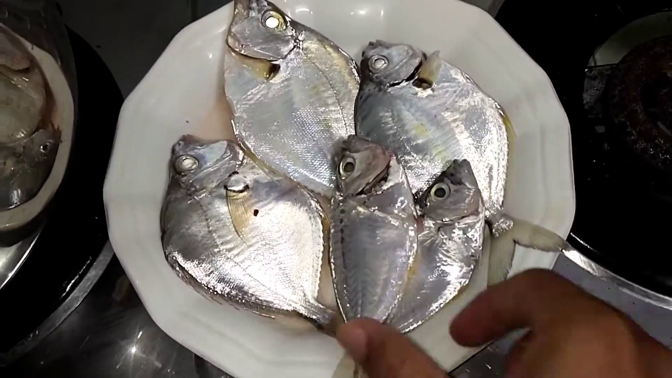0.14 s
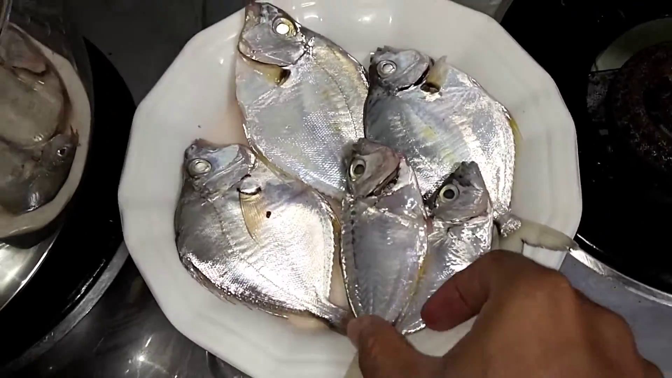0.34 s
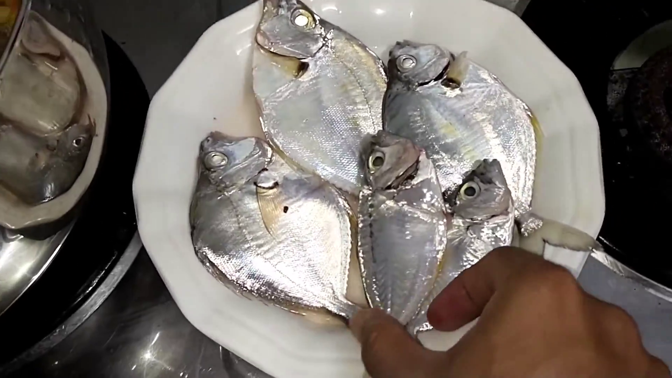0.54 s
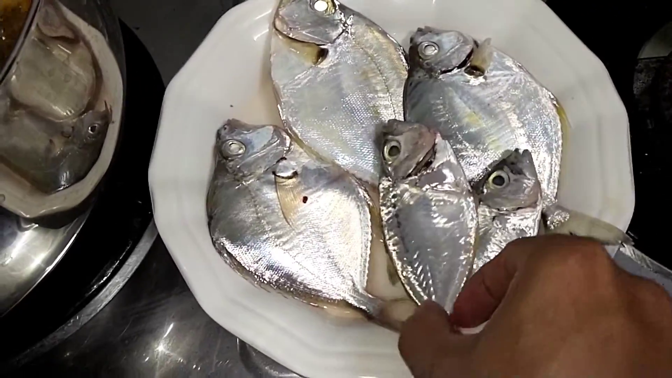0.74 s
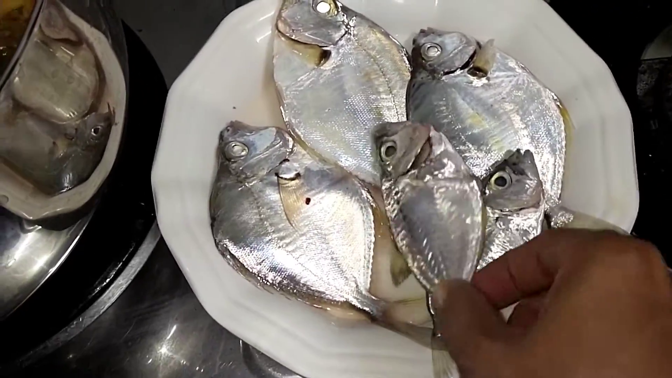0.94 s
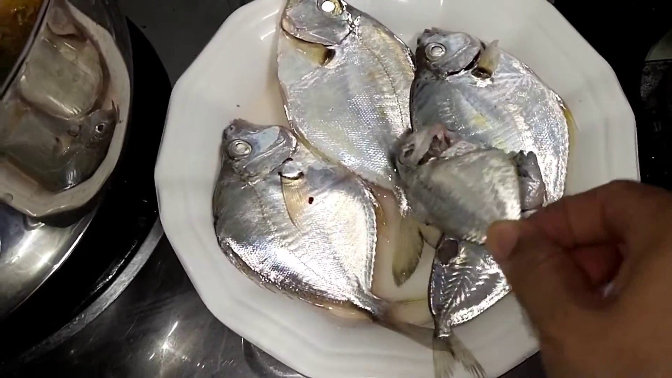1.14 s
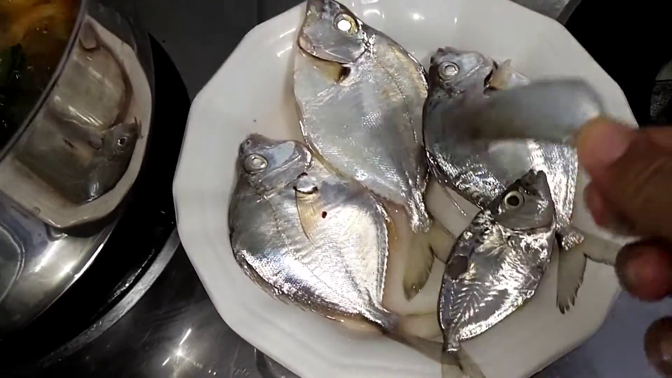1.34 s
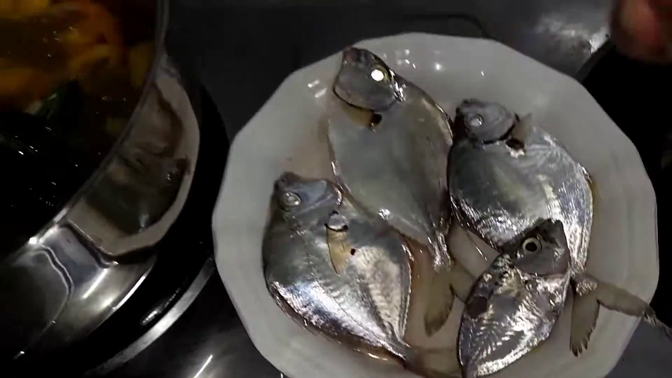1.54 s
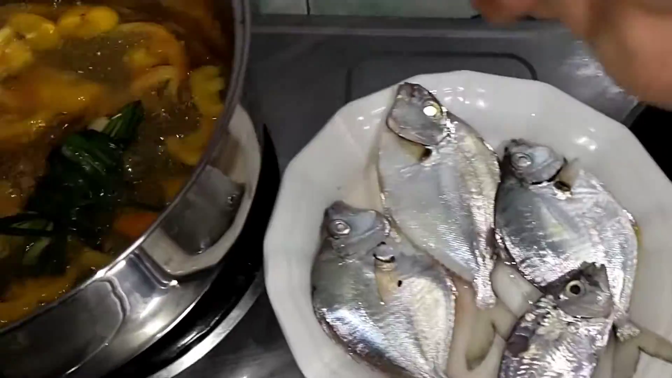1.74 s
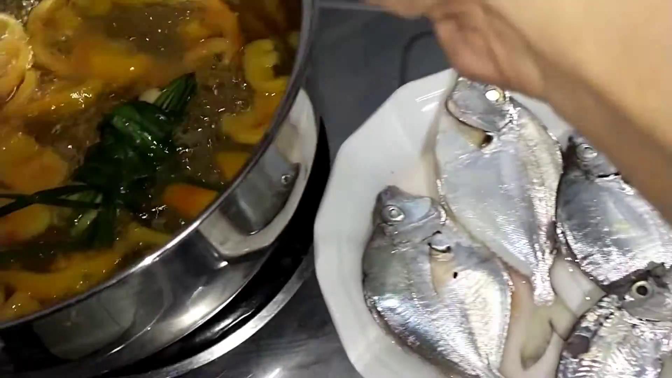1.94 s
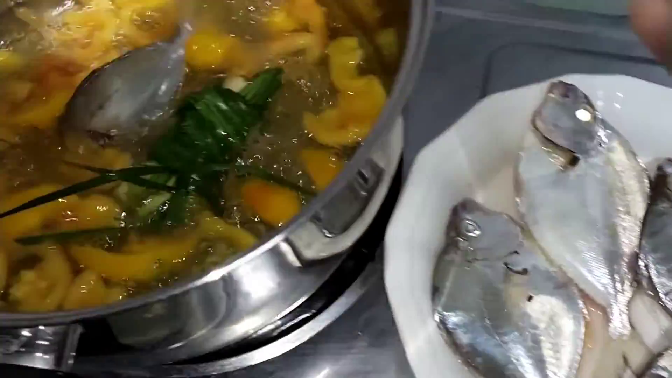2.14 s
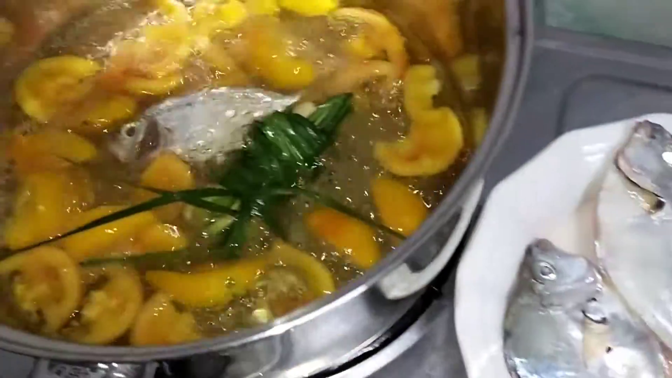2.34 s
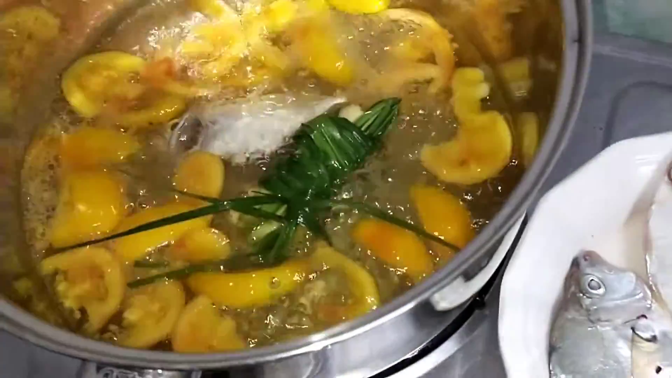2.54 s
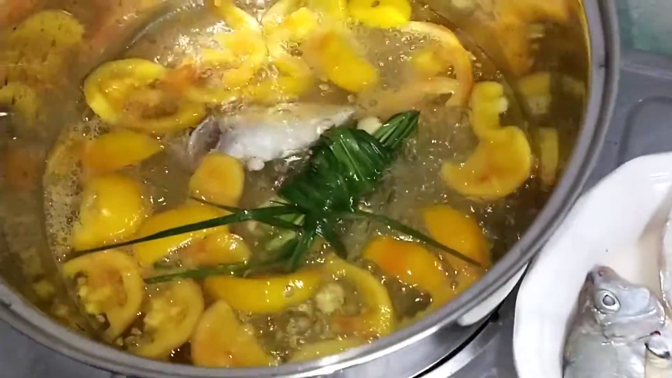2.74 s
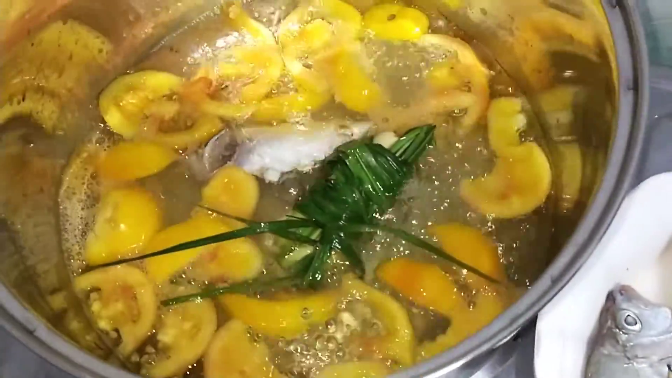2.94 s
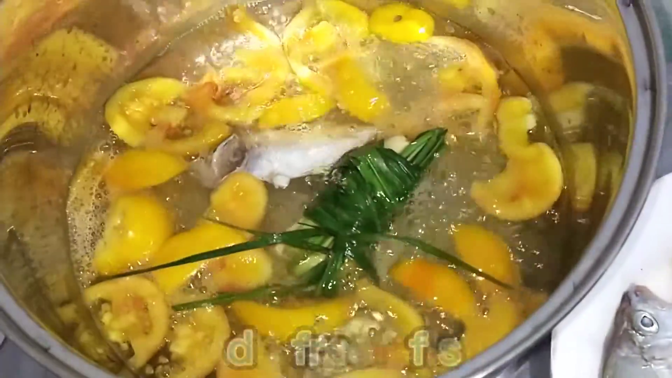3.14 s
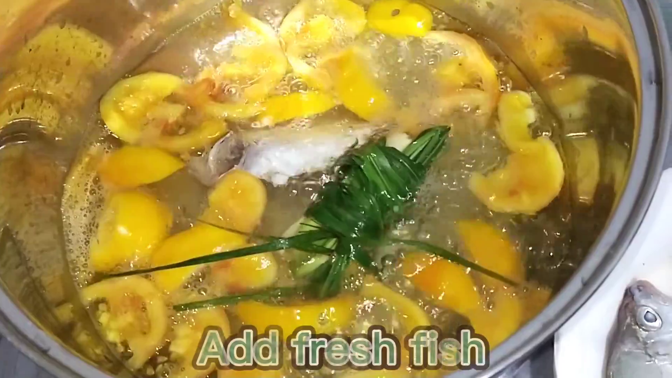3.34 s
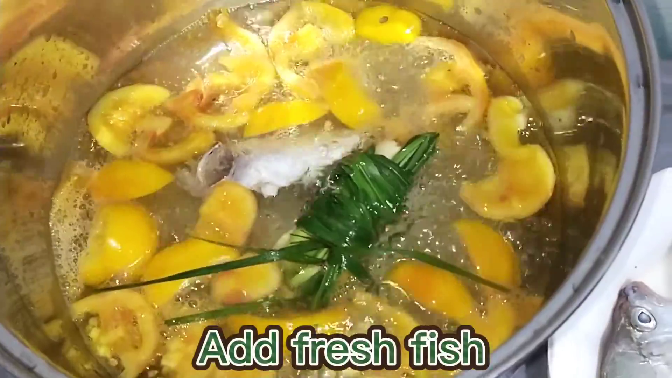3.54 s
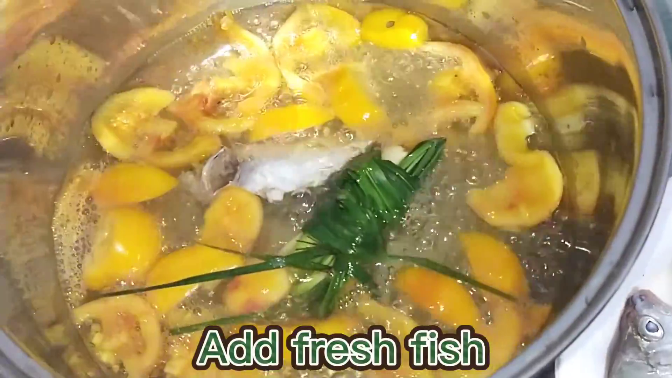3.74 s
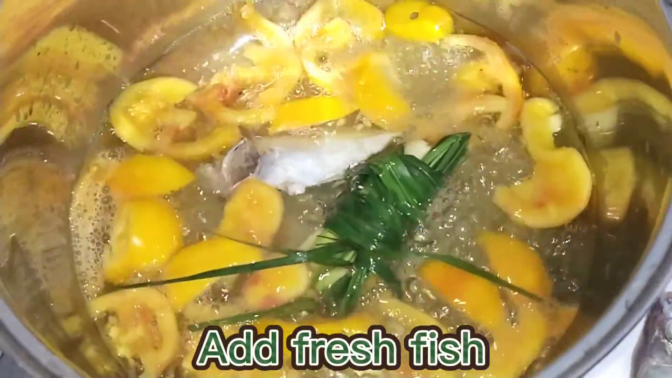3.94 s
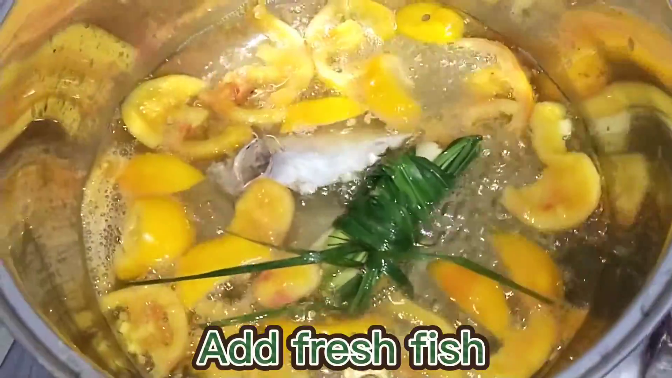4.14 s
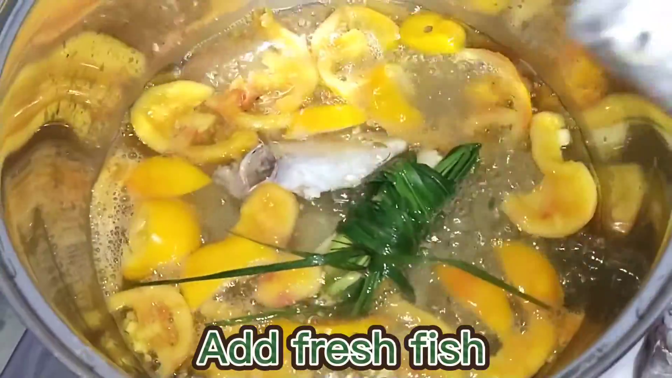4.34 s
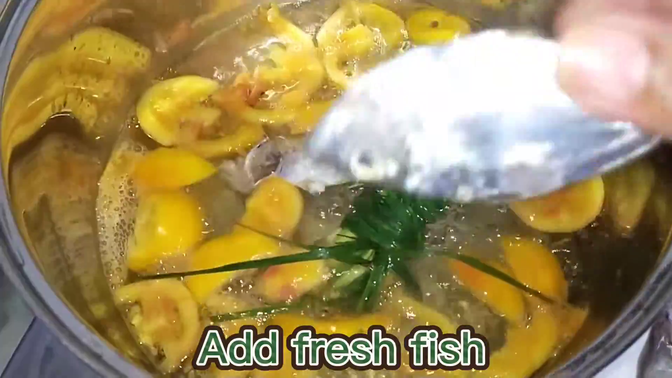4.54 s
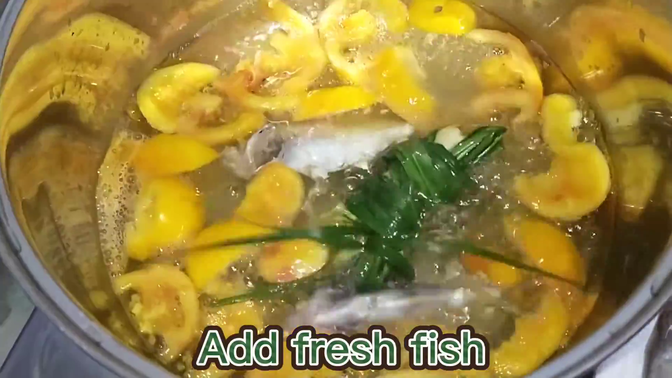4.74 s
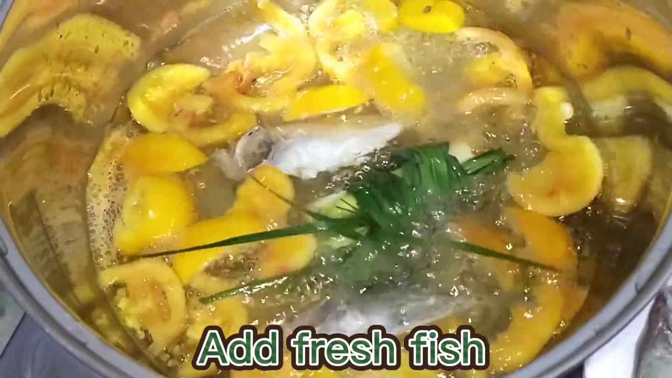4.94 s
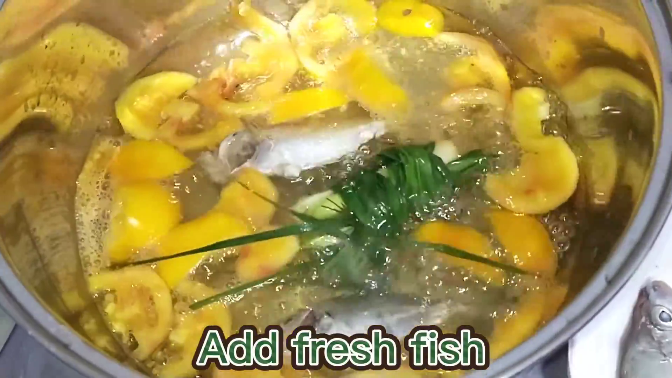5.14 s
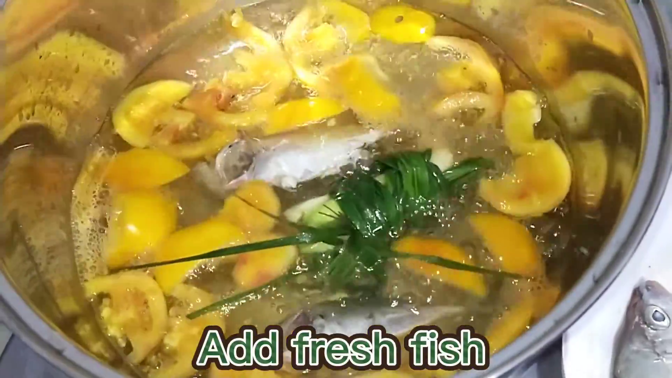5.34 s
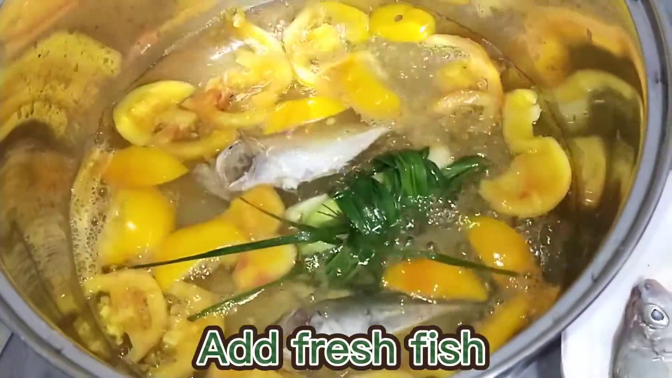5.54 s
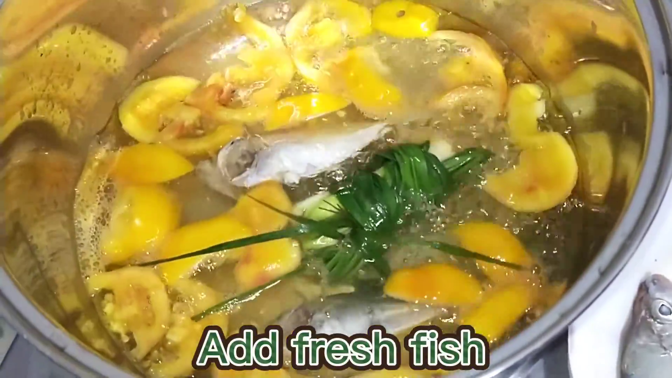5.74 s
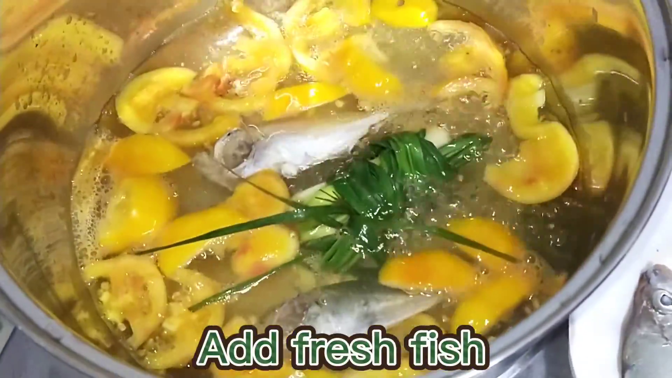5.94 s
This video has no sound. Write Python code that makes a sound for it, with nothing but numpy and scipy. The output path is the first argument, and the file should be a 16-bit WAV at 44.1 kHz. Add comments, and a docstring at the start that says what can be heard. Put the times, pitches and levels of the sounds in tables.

```python
"""Broth spits and hisses on the hot metal of a steel pot as fish are lowered into it on a gas stove.
Each fish throws out a spill that cracks and boils off in a burst of steam; single drops sizzle between.
Small bubbles keep the air in the pot ringing, while big ones gurgle and the surface sloshes.
The gas flame rumbles underneath, beside a faint, thin kitchen tone. The stereo image of the pot
shifts as the close listening point turns from plate to pot."""
import sys
import numpy as np
from scipy import signal
from scipy.fft import rfft, irfft, next_fast_len
from scipy.io import wavfile
from scipy.ndimage import uniform_filter1d, map_coordinates

SR = 44100
rng = np.random.default_rng(int(sys.argv[2]) if len(sys.argv) > 2 else 0)


def log_audio(samples):
    """Write samples as a 16-bit WAV file to the path given in sys.argv[1]."""
    # one column per channel
    frames = np.atleast_2d(samples).T
    # limit to full scale, then quantise
    limited = np.clip(frames, -1, 1)
    pcm = np.round(limited * 32767).astype(np.int16)
    wavfile.write(sys.argv[1], SR, pcm)


N = 268260
MERGED_DEPTH = 0.33  # share of the sputter depth left when pops or bubbles crowd together
SWELL_STEP = 32  # samples between points of a swell envelope


def boil_off():
    """Spills and single drops boil away on hot steel: dB envelopes of steam, spray, fizz and pot ring."""
    # single drops (start [s], rise [s], hold [s], steam [dB], spray over steam [dB], fizz over steam [dB])
    drops = [(0, 0.00057, 0.093, -40.5, 5, 0), (0.133, 0.012, 0.013, -50.5, 1, -12),
             (0.204, 0.012, 0.012, -49, 14, -4), (0.29, 0.0087, .005, -70, 16, -15),
             (0.333, 0.01, .005, -61, 17, -13), (0.408, 0.035, 0.035, -46, 2, -2.5),
             (0.598, 0.015, 0.015, -52, 13, 4), (0.624, 0.012, 0.014, -50.5, 10.5, 0),
             (0.71, 0.015, 0.016, -64, 2, -15), (0.777, 0.018, 0.011, -49, 0.5, -25),
             (0.809, 0.025, 0.03, -44.5, -4, -20), (0.909, 0.032, 0.024, -47, 5, -7),
             (0.954, 0.042, 0.034, -48.5, 8.5, 2.5), (1.029, 0.025, 0.031, -51, 10, 8.5),
             (1.155, 0.12, 0.042, -50, 6, -14), (1.288, .012, 0.009, -52.5, 7, -14),
             (1.325, 0.017, 0.015, -45.5, -10.5, -14), (1.525, 0.047, 0.15, -51, 6, -27),
             (1.695, 0.02, 0.18, -48.5, 0, -21), (2.693, 0.024, 0.18, -46, -18, -2.5),
             (2.908, 0.093, 0.25, -46.5, -4, -3.5), (3.138, 0.013, 0.15, -48, -18, -3),
             (3.358, 0.0062, 0.0067, -51, 2.5, -12), (3.42, 0.02, 0.015, -55, 7, -8),
             (3.52, 0.0088, 0.083, -50.5, 5.5, -10), (3.702, 0.049, 0.13, -39.5, -5, -4),
             (3.968, 0.076, 0.0099, -47, -5, -9), (4.085, 0.1, 0.09, -46, 3.5, -26),
             (4.315, 0.072, .1, -46.5, -1, -6), (5.482, 0.013, 0.21, -40, 0, -0.5),
             (5.856, 0.0096, 0.028, -47, 0, -13), (5.968, 0.034, 0.024, -50.5, 6, -10)]
    # one spill per fish (time [s], steam [dB], spray over steam [dB], pot ring [dB])
    spills = [
        [(1.853, -25, 6, -33), (1.862, -29, -1, -27), (1.874, -32.5, 6, -53), (1.902, -30, 15.5, -52),
         (1.964, -21.5, 3, -46), (1.998, -22.5, 2, -30), (2.044, -26.5, 4, -48), (2.08, -27.5, 2, -28.5),
         (2.188, -32.5, 4, -47), (2.28, -27.5, 2.5, -40.5), (2.384, -29.5, 0.5, -36), (2.456, -36.5, 1, -52),
         (2.592, -59, -26, -85), (2.6, -65, -17, -55)],
        [(4.46, -43, -8, -66), (4.474, -44, -3, -37), (4.54, -28, 6.5, -42), (4.592, -24, 3.5, -28.5),
         (4.808, -30.5, -1, -43.5), (4.85, -29, 2.5, -41), (4.922, -33, -0.5, -61), (4.986, -31, -5, -33),
         (5.064, -34, -5, -50), (5.096, -30.5, -5, -30), (5.176, -33, -6, -36.5), (5.25, -43, -14, -42),
         (5.332, -55.5, -21, -60), (5.36, -55, -13, -64)],
    ]
    shapes_db = swells(drops, sag_db_per_s=45.6, release_db_per_s=520)
    peak_db, spray_over_db, fizz_over_db = np.transpose(drops)[3:]
    steam_db = summed(shapes_db, peak_db)
    spray_db = summed(shapes_db, peak_db + spray_over_db)
    fizz_db = summed(shapes_db, peak_db + fizz_over_db)
    ring_db = steam_db - 7.5
    for spill in spills:
        silence_before = (spill[0][0] - 0.003, -99, 0, -99)
        silence_after = (spill[-1][0] + 0.1, -99, 0, -99)
        spill_db, spill_spray_db, spill_ring_db = curves([silence_before, *spill, silence_after])
        steam_db = power_sum(steam_db, spill_db)
        spray_db = power_sum(spray_db, spill_db + spill_spray_db)
        fizz_db = power_sum(fizz_db, spill_db - 10.5)
        ring_db = power_sum(ring_db, spill_ring_db)
    return steam_db, spray_db, fizz_db, ring_db


def hiss(steam_db, spray_db, fizz_db):
    """Steam and a finer spray sputter together off the hot metal, with tiny bubbles fizzing in the froth."""
    # steady sizzle (time [s], steam [dB], spray [dB], steam pan L-R [dB], spray pan L-R [dB])
    sizzle_bed = [(0, -49, -41, 3.5, 11), (.4, -59, -46, -5, 15), (.7, -55, -48.5, 0.5, 18),
                  (1.2, -50, -47, 1, 14), (1.5, -56, -53, 0, 12.5), (2.2, -56.5, -51.5, -1.5, 5.5),
                  (6.08, -55.5, -55.5, -0.5, 9)]
    # spectra of the steam and of the fine spray (frequency [Hz], level [dB])
    steam_spectrum = [(710, -41), (1200, -13), (1230, 0.5), (1510, -5.5), (2040, -2), (2550, -0.5),
                      (3510, -1), (4830, -3.5), (5770, -10.5), (6650, -1), (7140, 1.5), (7700, -7),
                      (8600, -8), (10000, -7.5), (13000, -13.5), (22000, -120)]
    spray_spectrum = [(4710, -15.5), (8000, -3), (8700, -8), (10900, -5), (12400, -7), (14400, -0.5),
                      (15300, 4.5), (16000, 2)]
    # bands where the steam sings, each coming and going (centre [Hz], width [Hz], level over steam [dB])
    singing_bands = [(6700, 700, -13), (7500, 800, -13)]
    patchy_db = 2.6
    bed_steam_db, bed_spray_db, steam_pan, spray_pan = curves(sizzle_bed)
    depth = np.interp(steam_db, [-48, -33], [1, MERGED_DEPTH])  # loud steam merges the pops into a roar
    pops = (sputter(count=300, life_s=0.012, spread_db=6) * amp(1.4 * wobble(25))) ** depth
    steam = rush(lambda f: amp(along(steam_spectrum, f)), pops, patchy_db)
    for centre, width, db in singing_bands:
        gain = amp(db + 4 * wobble(9))
        steam += gain * rush(modes([(centre, width, 0)], power=2), pops, patchy_db)
    crackle = sputter(count=250, life_s=0.0035, spread_db=10) ** depth
    spray = rush(lambda f: amp(along(spray_spectrum, f)), pops * crackle, patchy_db)
    flicker_db = 0.65 * wobble(7.8)
    steam = panned(steam, steam_pan + 0.38 * wobble(7.2))
    spray = panned(spray, spray_pan + 1.2 * wobble(3.16))
    return (amp(power_sum(steam_db, bed_steam_db + flicker_db)) * steam
            + amp(power_sum(spray_db, bed_spray_db + flicker_db)) * spray
            + amp(fizz_db) * fizz(count=7000, centre_hz=3302, log_spread=0.35))


def spits():
    """Each sudden spit is a wet slap, a short bright crack and a low push of the broth."""
    # spits (time [s], level [dB], crack over level [dB], push over level [dB], slap t60 [s])
    hits = [(1.851, -11.5, 2.5, 33, 0.071), (1.897, -38, 24, 10, 0.03), (2.696, -38, -20, 14, 0.07),
            (2.789, -25.5, -24, 11, 0.14), (3.13, -19, -14, 16, 0.22), (4.48, -17.5, 0, 20, 0.051),
            (4.828, -13, -22, 5, 0.12), (5.09, -27, -20, 13, 0.044), (5.25, -28, -7, 8, 0.033),
            (5.857, -31, -7, 12, 0.34), (6.048, -33.5, -21, 37, 0.097)]
    # resonances of the wet slap and of the push under it (centre [Hz], width [Hz], level [dB])
    slap_modes = [(308, 1100, -9.5), (960, 470, -3.5), (2370, 550, -9)]
    push_mode = (67, 105, -1.2)
    crack_t60_s = 0.008
    slaps, cracks, pushes = np.zeros((2, N + SR)), np.zeros((2, N + SR)), np.zeros(N)
    t = np.arange(SR // 4) / SR
    for start, db, crack_db, push_db, t60 in hits:
        noise = rng.standard_normal((3, len(t)))
        centre, sides = noise[0], noise[1:]
        at = round(start * SR)
        slaps[:, at:at + len(t)] += amp(db - 60 * t / t60) * (centre + 0.93 * sides)
        cracks[:, at:at + len(t)] += amp(db + crack_db - 60 * t / crack_t60_s) * (centre + 1.2 * sides)
        slaps[:, at] += amp(db + 14)  # a spike sharpens each attack
        cracks[:, at] += amp(db + crack_db + 7)
        pushes[at] = amp(db + push_db)
    return (amp(6) * filtered(slaps[:, :N], modes(slap_modes))
            + amp(-1) * filtered(cracks[:, :N], low_cut(hz=8000, order=1))
            + filtered(pushes, modes([push_mode])))


def droplet_ticks():
    """Single droplets spit in very short bursts of bright noise, left of centre."""
    # droplets (time [s], level [dB])
    droplets = [(0.138, -31), (0.189, -38), (0.212, -33), (0.307, -36), (0.343, -35), (0.5656, -42),
                (0.592, -38), (0.734, -39), (0.7945, -36), (0.854, -42), (0.8934, -37), (0.9368, -44),
                (1.01, -33), (1.0294, -34), (1.08, -31.5), (1.29, -32), (1.6062, -43), (1.7095, -41)]
    rise_s = 0.0026
    age = np.arange(SR // 20) / SR / rise_s
    envelope = age * np.exp(1 - age)
    bursts = np.zeros((2, N + SR))
    for start, db in droplets:
        at = round(start * SR)
        bursts[:, at:at + len(age)] += amp(db) * envelope * rng.standard_normal((2, len(age)))
    crisp = filtered(bursts[:, :N], low_cut(hz=6140, order=2))
    return panned(crisp, pan_db=np.full(N, 5.5))


def broth(ring_db):
    """Small bubbles keep the air in the pot ringing; the surface sloshes and large bubbles gurgle low."""
    # simmer of small bubbles (time [s], upper pot ring [dB], lower pot ring [dB])
    simmer = [(0.0, -80, -65), (0.17, -68, -67), (0.74, -78, -56.5), (0.86, -60, -58), (1.73, -61, -58.5),
              (2.03, -31, -42), (2.2, -54, -54), (2.29, -40, -37), (2.42, -63, -54), (2.9, -50.5, -50),
              (3.1, -50, -55.5), (3.18, -63, -42.5), (3.56, -56, -57), (4.42, -51, -54), (4.61, -36, -33),
              (4.66, -36, -41), (5.08, -50, -46.5), (5.23, -54, -55.5), (6.08, -61, -57)]
    # large bubbles and surges (start [s], rise [s], hold [s], gurgle [dB], slosh [dB])
    surges = [(0.166, 0.041, 0.2, -54, -57), (0.433, 0.066, 0.026, -74, -52),
              (0.595, 0.022, 0.018, -49, -72), (0.967, 0.029, .02, -51, -64),
              (1.854, 0.022, 0.04, -37, -42), (1.883, 0.091, 0.024, -32, -27.5),
              (1.96, 0.045, 0.086, -32, -28.5), (2.12, 0.05, 0.02, -30.5, -36),
              (2.25, 0.061, 0.22, -53, -36), (2.422, 0.03, 0.28, -41.5, -63),
              (2.69, 0.0086, 0.15, -38.5, -42.5), (2.727, 0.01, .05, -53, -43.5),
              (2.748, 0.043, 0.053, -38.5, -42.5), (2.832, 0.024, 0.17, -37.5, -62),
              (3.137, 0.028, 0.043, -37, -35.5), (3.214, 0.015, 0.018, -35.5, -53),
              (3.57, 0.031, 0.084, -50, -71), (3.7, 0.054, 0.051, -66, -49.5),
              (4.002, 0.024, 0.057, -47.5, -79), (4.34, 0.076, 0.041, -51, -46.5),
              (4.449, 0.065, 0.058, -35, -42), (4.55, 0.039, 0.17, -70, -32.5),
              (4.834, 0.017, 0.14, -35, -29), (5.07, 0.015, 0.089, -62, -37.5),
              (5.315, 0.024, 0.06, -48.5, -64), (5.473, 0.026, 0.04, -46, -43.5),
              (6.007, 0.017, 0.064, -40, -69.5)]
    # spectrum of the sloshing surface (frequency [Hz], level [dB])
    slosh_spectrum = [(200, -40), (400, -10.5), (800, -6.5), (1150, -8.5), (1500, -22), (2000, -12.5),
                      (2500, -19), (3500, -39)]
    # resonances (centre [Hz], width [Hz], level [dB])
    pot_modes = [
        [(649.6, 84, 0)],
        [(1130, 76, 6.5), (1330, 85, -4.5)],
    ]  # air in the pot: the lower ring, then the upper pair
    overtone_modes = [(1910, 210, 0), (2470, 130, -6), (2860, 170, -4)]  # its higher modes
    side_modes = [(1300, 55, 0), (1780, 70, -12), (3400, 900, -10)]  # heard only from beside the pot
    gurgle_modes = [(183, 81, -3), (221.7, 28, 7.5), (250, 28, 6), (355, 140, -2)]  # big bubbles under the fish
    # ring of the side modes (time [s], level [dB])
    side_levels = [(0, -74), (.15, -59), (.45, -56), (.7, -69), (.9, -47.5), (1.2, -75), (1.6, -80),
                   (2.4, -81), (6.08, -68)]
    shapes_db = swells(surges, sag_db_per_s=91, release_db_per_s=172)
    gurgle_peaks_db, slosh_peaks_db = np.transpose(surges)[3:]
    gurgle_db = power_sum(summed(shapes_db, gurgle_peaks_db), -58 + 5.2 * wobble(9.8))
    slosh_db = power_sum(summed(shapes_db, slosh_peaks_db), -66 + 5 * wobble(6))
    depth = np.interp(slosh_db, [-48, -33], [1, MERGED_DEPTH])  # single bubbles merge in a strong surge
    bubbling = sputter(count=300, life_s=0.037, spread_db=5) ** depth
    lower, upper = (rush(modes(group, power=1.66), bubbling, patchy_db=2.5) for group in pot_modes)
    slosh = rush(lambda f: amp(along(slosh_spectrum, f)), bubbling, patchy_db=3.5)
    gurgle = rush(modes(gurgle_modes), sputter(count=200, life_s=0.011, spread_db=7), patchy_db=-1)
    upper_db, lower_db = curves(simmer)
    rings = amp(power_sum(ring_db, upper_db + 2.6 * wobble(10))) * upper
    rings += amp(lower_db + 3.2 * wobble(12)) * lower
    rings += amp(lower_db - 9.5) * rush(modes(overtone_modes, power=2.35), bubbling, patchy_db=3)
    side_db = curves(side_levels)[0] + 5 * wobble(12.8)
    rings += amp(side_db) * rush(modes(side_modes, power=2), bubbling, patchy_db=6)
    froth = amp(-4) * fizz(count=1200, centre_hz=1200, log_spread=0.6)  # stirred up by the surges
    return rings + amp(slosh_db) * (slosh + froth) + amp(gurgle_db) * gurgle


def large_bubbles():
    """Each large bubble rings as a clear tone that swells while its pitch glides, then dies."""
    # bubbles (time [s], first pitch [Hz], last pitch [Hz], rise [s], glide [s], peak [dB])
    bloops = [(1.925, 258.6, 254.4, 0.036, 0.046, -28.5), (1.97, 256, 243.5, 0.03, 0.066, -33),
              (1.954, 380, 397, 0.015, .05, -29.5), (2.03, 232, 210, 0.033, 0.072, -33.5),
              (2.14, 247, 231, 0.02, 0.041, -32), (2.179, 221, 216, 0.024, .07, -27.5),
              (2.185, 348, 352, 0.013, .03, -33), (2.771, 242, 270.4, 0.027, 0.07, -34),
              (2.785, 338, 347, .015, .04, -39), (2.859, 210, 207, 0.026, .04, -43),
              (3.152, 235, 224, 0.015, .04, -28.5), (3.195, 258, 270, 0.009, 0.026, -36),
              (3.235, 257, 267, 0.018, 0.054, -35), (6.049, 292, 370, .028, 0.02, -30.5)]
    out, t = np.zeros(N + SR), np.arange(SR // 2) / SR
    for start, first_hz, last_hz, rise, glide, db in bloops:
        age = t / rise
        hz = first_hz + (last_hz - first_hz) * np.minimum(t / glide, 1)
        tone = np.sin(2 * np.pi * (np.cumsum(hz) / SR + rng.random()))
        out[round(start * SR):][:len(t)] += amp(db) * age * np.exp(1 - age) * tone
    return out[:N]


def fizz(count, centre_hz, log_spread):
    """A cloud of small bubbles, each a short rising tone with its own pan; rms 1."""
    life_cycles = 12
    when = rng.random(count)
    pitch, size, side = rng.standard_normal((count, 3)).T
    span = np.arange(int(2 * life_cycles * SR / centre_hz))
    hz = centre_hz * np.exp(log_spread * np.clip(pitch, -1.5, 1.5))
    cycles = span / SR * hz[:, None]
    age = cycles / life_cycles
    envelope = amp(3.4 * size)[:, None] * age * np.exp(-3 * age) * (1 - span / len(span))
    tones = envelope * np.sin(2 * np.pi * cycles * (1 + 0.03 * age))
    at = ((when * N).astype(int)[:, None] + span).ravel()
    channels = [tones * amp(sign * 4.1 * side)[:, None] for sign in (1, -1)]
    return unit(np.array([np.bincount(at, channel.ravel(), N + SR)[:N] for channel in channels]))


def gas_flame():
    """The flame flutters low in the cavity under the pot."""
    # cavity resonances (centre [Hz], width [Hz], level [dB])
    cavity_modes = [(76.5, 10.5, -3), (117, 55, -8.5), (189, 60, -10.5)]
    # flame rumble (time [s], lowest mode [dB], upper modes [dB])
    rumble_levels = [(0.0, -51, -51.5), (0.12, -58, -47), (0.39, -61, -59.5), (0.56, -51, -45.5),
                     (0.96, -55, -54), (1.4, -40, -46.5), (1.57, -46.5, -62), (1.89, -44, -40),
                     (2.3, -61, -47.5), (2.54, -39, -48.5), (2.76, -53, -46), (3.2, -44.5, -41.5),
                     (3.42, -53, -52), (3.52, -44.5, -46.5), (5.25, -55, -56), (5.54, -42, -43.5),
                     (5.77, -63, -51), (6.08, -54, -52)]
    low_db, upper_db = curves(rumble_levels)
    low = rush(modes(cavity_modes[:1]), amp(0.27 * wobble(14)), patchy_db=5)
    upper = rush(modes(cavity_modes[1:]), amp(wobble(16)), patchy_db=-0.6)
    return amp(low_db) * low + amp(upper_db) * upper


def kitchen_tone():
    """A thin, wavering tone in the kitchen fades as the listener turns."""
    pitch_hz, level_db = 469, -68
    fade_db = curves([(0, 2), (1.8, -1), (2.6, -11), (6.08, -8)])[0]  # (time [s], level [dB])
    tone = np.sqrt(2) * np.sin(2 * np.pi * np.cumsum(pitch_hz + 5 * wobble(29)) / SR)
    return amp(level_db + fade_db + 2.5 * wobble(13.2)) * tone


def rush(colour, gain, patchy_db):
    """Stereo noise with random patches in time and pitch, shaped by gain and colour; mid rms 1."""
    # stereo likeness, wider in the treble (frequency [Hz], left-right correlation [0-1])
    likeness = [(60, 1), (290, 0.89), (640, 0.81), (1400, 0.81), (3000, 0.21), (15000, 0.23)]
    spectra = signal.stft(rng.standard_normal((2, N)) * gain, nperseg=512)[2]
    patches = uniform_filter1d(rng.standard_normal(spectra.shape[1:]), size=3, axis=0)
    patches = uniform_filter1d(patches, size=7, axis=1)
    pair = signal.istft(spectra * amp(patchy_db * unit(patches)), nperseg=512)[1][:, :N]
    angle = lambda hz: np.arccos(np.clip(along(likeness, hz), -1, 1)) / 2
    mid, side = filtered(pair, lambda hz: colour(hz) * [np.cos(angle(hz)), np.sin(angle(hz))])
    return np.array([mid + side, mid - side]) / np.sqrt(np.mean(mid ** 2))


def sputter(count, life_s, spread_db):
    """A steady gain plus random bursts that start at once and die away; the largest are soft-limited."""
    when, size = rng.random((count, 2)).T
    rarity = -np.log(1.08 - size)
    kicks = np.bincount((when * N).astype(int), amp(spread_db * rarity), N) / 4
    bursts = signal.lfilter([1], [1, -np.exp(-1 / (life_s * SR))], kicks)
    return 1 + np.tanh(bursts)


def swells(rows, sag_db_per_s, release_db_per_s):
    """One dB envelope per (start, rise, hold) row: it rises, sags through the hold, then dies away."""
    start, rise, hold = np.abs(np.asarray(rows)[:, :3].T[..., None])
    since_peak = np.arange(0, N, SWELL_STEP) / SR - start - rise
    attack_db = 20 * np.log10(np.clip(1 + since_peak / rise, 1e-4, 1))
    return (attack_db - sag_db_per_s * np.clip(since_peak, 0, hold)
            - release_db_per_s * np.maximum(since_peak - hold, 0))


def summed(shapes_db, peaks_db):
    """All swells at their peak levels as one dB curve."""
    coarse_db = power_sum(*(shapes_db + np.reshape(peaks_db, (-1, 1))))
    return np.interp(np.arange(N), np.arange(0, N, SWELL_STEP), coarse_db)


def power_sum(*levels_db):
    """Combined level in dB of sounds whose powers add."""
    return 10 * np.log10(sum(amp(db) ** 2 for db in levels_db))


def modes(table, power=1):
    """Response of (Hz, width, dB) resonances of alternating sign; a power above 1 sharpens them."""
    return lambda f: sum((-1) ** k * amp(db) * 1j * f * width / (hz * hz - f * f + 1j * f * width)
                         for k, (hz, width, db) in enumerate(table)) ** power


def low_cut(hz, order):
    """High-pass response, 6 dB per octave for each order."""
    return lambda f: (1j * f / (hz + 1j * f)) ** order


def filtered(x, response):
    """x through a complex frequency response."""
    size = next_fast_len(N + SR // 2)
    return irfft(rfft(x, size) * response(np.fft.rfftfreq(size, 1 / SR)), size)[..., :N]


def wobble(rate):
    """A smooth random curve, rate knots a second."""
    return map_coordinates(rng.standard_normal(int(N * rate / SR) + 4), [np.arange(N) * rate / SR])


def curves(rows):
    """One value per sample for each column after the time."""
    times, *columns = np.transpose(rows)
    return [np.interp(np.arange(N) / SR, times, column) for column in columns]


def along(points, hz):
    """Interpolate (Hz, value) points on a log axis."""
    freqs, values = np.transpose(points)
    return np.interp(np.log(hz + 1), np.log(freqs + 1), values)


def panned(x, pan_db):
    """Set the left channel pan_db above the right."""
    return x * amp(np.array([pan_db / 2, -pan_db / 2]))


def amp(db):
    """Decibels to gain."""
    return 10 ** (np.asarray(db) / 20)


def unit(x):
    """Scale to rms 1."""
    return x / np.sqrt(np.mean(x ** 2) + 1e-20)


def scene():
    """The pot reaches left and right at times that shift as the listener turns; flame and tone lie under."""
    # bearing of the pot (time [s], lag of left behind right [samples])
    bearing = [(0, -12), (1.5, -8), (2.4, -6), (2.9, 7), (4, 5), (5, 8.5), (6.08, 6.5)]
    steam_db, spray_db, fizz_db, ring_db = boil_off()
    pot = hiss(steam_db, spray_db, fizz_db) + broth(ring_db) + spits() + droplet_ticks() + large_bubbles()
    half_lag = curves(bearing)[0] / 2
    left = map_coordinates(pot[0], [np.arange(N) - half_lag], order=3)
    right = map_coordinates(pot[1], [np.arange(N) + half_lag], order=3)
    return np.array([left, right]) + gas_flame() + kitchen_tone()


def record(dry):
    """The microphones drop the deepest bass, and a band limit cuts the very top."""
    bass_cut, top_hz = low_cut(hz=58, order=3), 15480
    return filtered(dry, lambda hz: bass_cut(hz) * (hz < top_hz))


dry = scene()
out = record(dry)
log_audio(out)
```